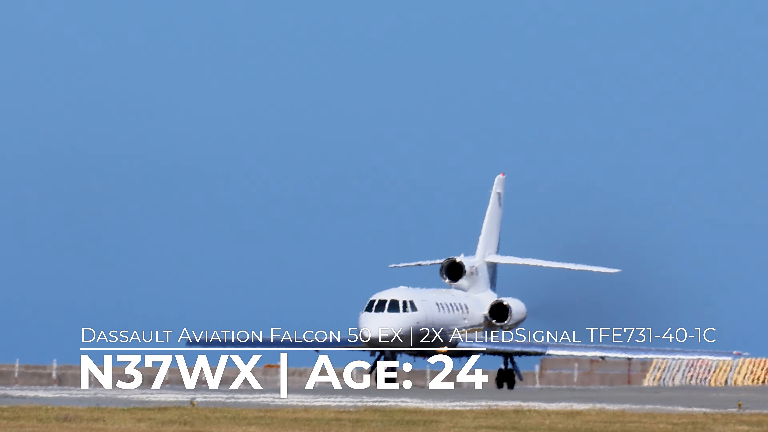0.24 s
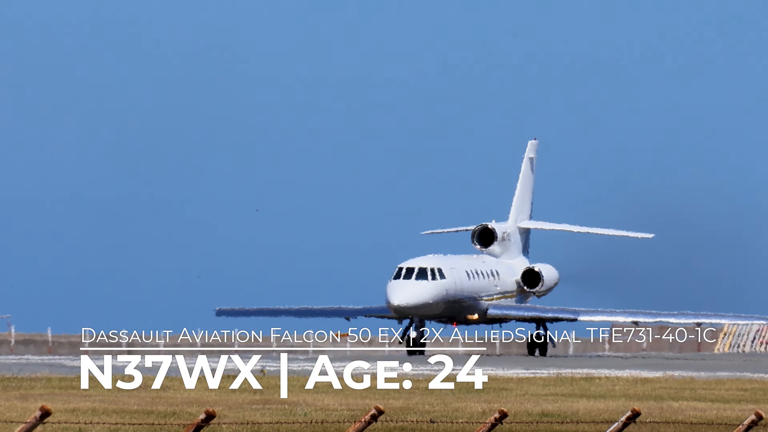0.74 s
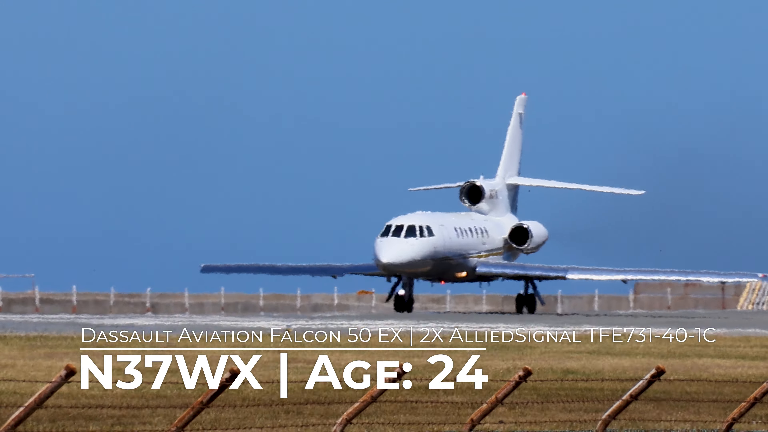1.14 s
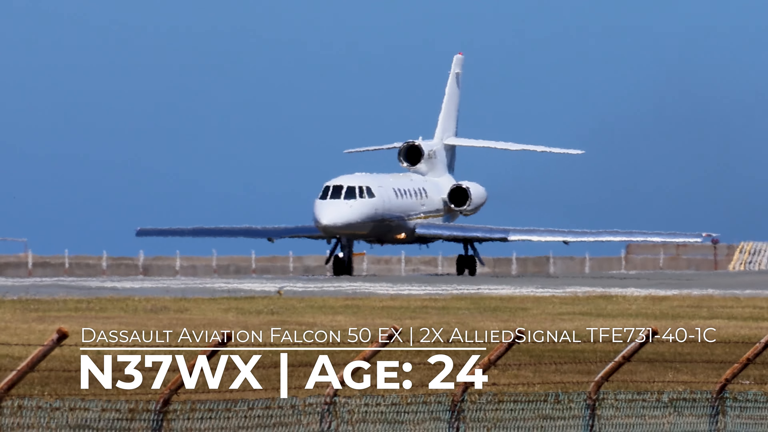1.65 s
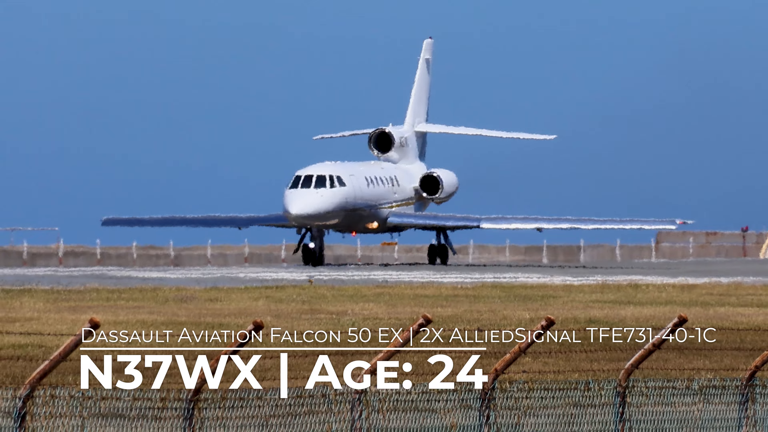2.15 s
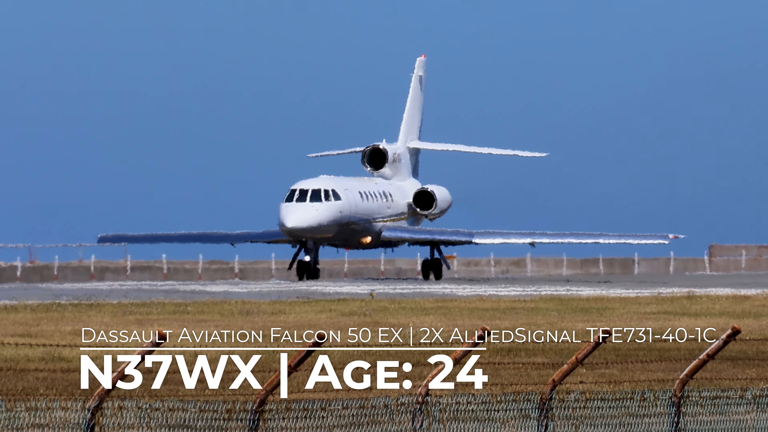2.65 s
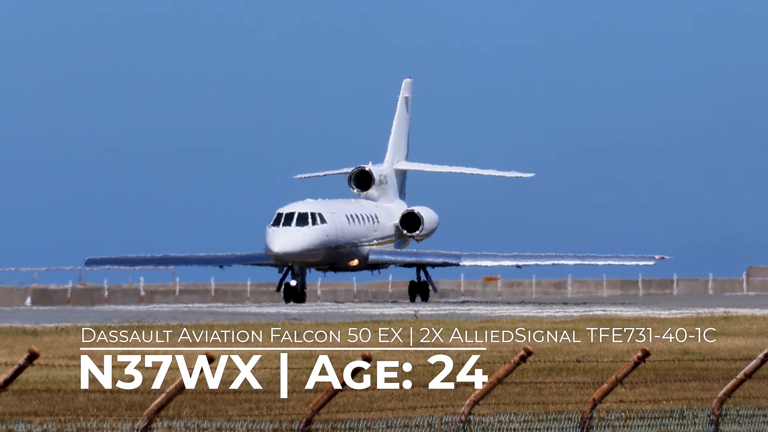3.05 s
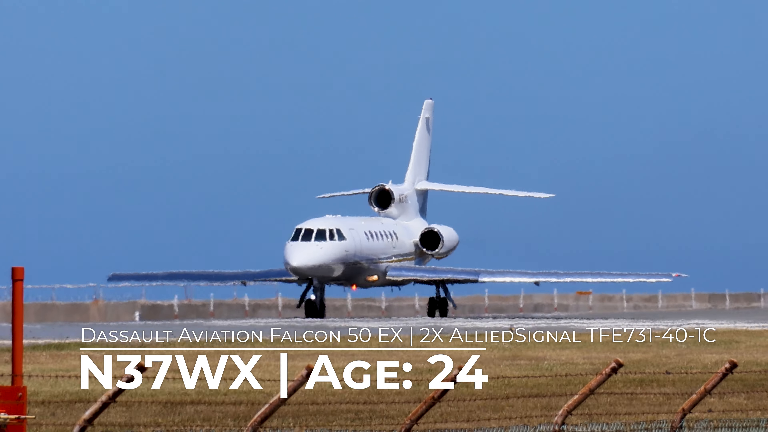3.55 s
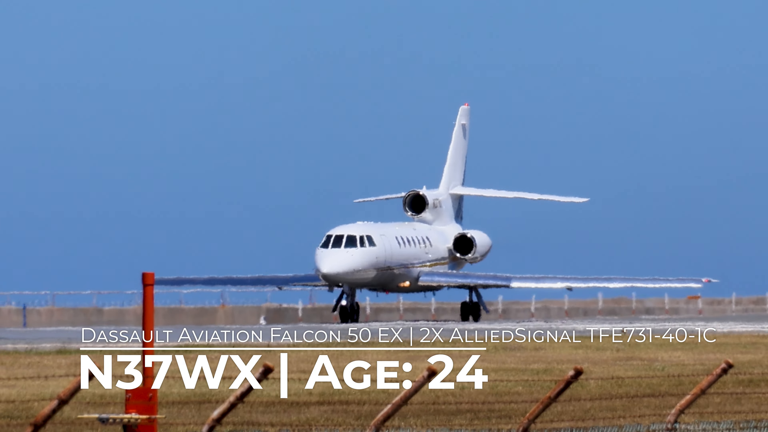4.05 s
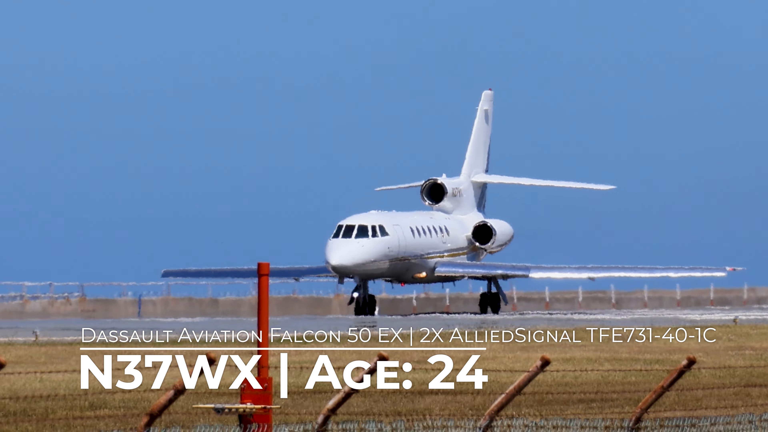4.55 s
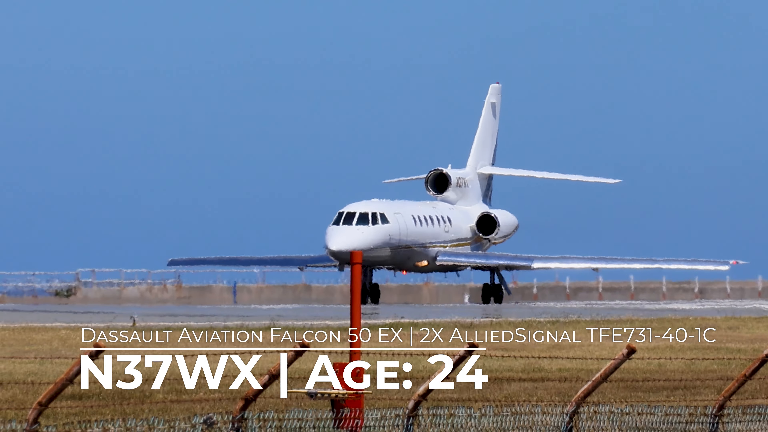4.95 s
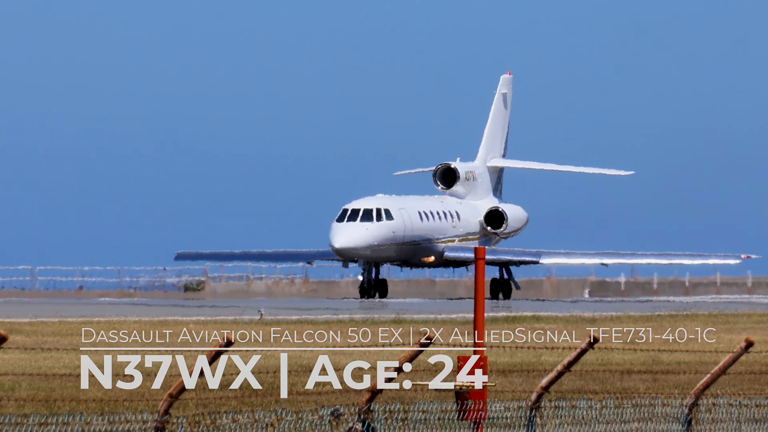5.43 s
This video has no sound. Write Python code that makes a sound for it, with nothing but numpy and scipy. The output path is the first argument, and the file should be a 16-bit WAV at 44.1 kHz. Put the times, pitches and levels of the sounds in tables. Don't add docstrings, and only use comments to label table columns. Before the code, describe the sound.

A three-engined jet far across an open airfield spools up: a soft roar grows over about two and a half seconds while a thin fan whine climbs in pitch. A buzzing mid-high howl then joins and the roar holds, wavering. Close up, wind flaps and thumps the unprotected stereo microphone, with the distant jet dipping briefly after the hardest hits.

```python
import sys
import numpy as np
from scipy import signal
from scipy.fft import irfft, next_fast_len
from scipy.io import wavfile
from scipy.ndimage import uniform_filter1d

SR = 44100
rng = np.random.default_rng(int(sys.argv[2]) if len(sys.argv) > 2 else 0)


def to_wav(sig):
    pcm = np.clip(np.atleast_2d(sig), -1, 1) * 32767
    pcm = np.round(pcm).astype(np.int16)
    wavfile.write(sys.argv[1], SR, pcm.T)


def gain_from_db(level_db):
    decades = np.asarray(level_db, float) / 20
    return 10 ** decades


N = 250929

# t/s, roar level/dB, fan howl band standing out/dB
ENGINE_ROAR = [(0.0, -48.5, -0.5), (0.12, -45.5, -1), (0.55, -39.5, -1.5), (0.96, -35, 0.5),
               (1.3, -33, 0.5), (1.7, -31.5, 0), (2.05, -29.5, 3), (2.38, -27, 2), (2.7, -28.5, 0),
               (3.14, -27, 3.5), (3.47, -32.5, -2), (3.72, -30.5, 2), (4.15, -30, 1), (4.7, -32.5, 1.5),
               (5.1, -33, 2), (5.69, -32, 0.5)]
# f/Hz, level per Hz/dB
ROAR_COLOUR = [(300, -6.5), (520, -7.5), (750, -10.5), (1190, -2.5), (1510, -6), (2170, 0), (2420, -7.5),
               (2730, -7), (3000, -13.5), (4000, -13), (4700, -10), (5400, -18.5), (6000, -32.5),
               (7500, -56.5), (10000, -81.5)]
# f/Hz, level/dB
SLOW_COLOUR = [(500, -4), (1500, 1), (2000, 1), (2500, -14), (3500, 8), (4300, 0), (5500, -27), (8000, 13)]
# t/s, f/Hz, tone level/dB, octave level/dB
BLADE_PASSING = [(0, 2890, -60, -64), (.35, 3110, -51, -66), (.6, 3255, -40, -69),
                 (.85, 3430, -44.5, -60.5), (1.05, 3610, -46, -66), (1.3, 3850, -42.5, -65),
                 (1.6, 4084, -40, -70), (1.78, 4290, -44, -104), (2.1, 4690, -46.5, -120),
                 (2.4, 5020, -42.5, -120), (2.75, 5270, -47.5, -120), (3.1, 5480, -58, -120),
                 (3.5, 5440, -51.5, -120), (4.2, 5510, -52.5, -120), (4.9, 5460, -62.5, -120),
                 (5.4, 5540, -51, -120), (5.69, 5600, -57, -120)]
# speed/share of the first, level under its octave/dB, t until hidden/s
OTHER_FANS = [(1.075, -8, .95), (.945, -9, .8)]
# t/s, f/Hz, level/dB
SHAFT_HOWL = [(2.0, 2125, -46), (2.15, 2160, -39), (2.3, 2176, -26.5), (2.42, 2195, -34.5),
              (2.55, 2201, -31.5), (2.9, 2223, -31), (3.3, 2232, -36), (3.65, 2243, -36.5),
              (3.85, 2254, -42.5), (4.1, 2274, -35.5), (4.4, 2270, -43), (4.72, 2257, -39),
              (5.1, 2277, -46), (5.3, 2286, -41.5), (5.5, 2323, -35), (5.69, 2310, -41.5)]
# order/1, level against the howl (itself order 12)/dB
SHAFT_ORDERS = [(6, -11), (6.5, -11), (8, -14), (10, -11), (11, -10), (14, -15), (15, -17)]
# f/Hz, level per Hz/dB
RUSTLE_COLOUR = [(6000, 13), (7000, 10), (8200, 3.5), (10000, -0.5), (13000, -.5), (15000, -1.5),
                 (16000, -10.5)]
# t/s, half length/s, rise/dB
RUSTLE_SWELLS = [
    (0.052, 0.34, -5.5),
    (1.29, 0.3, 3.5),
    (4.449, .5, -2.5),
    (5.424, .07, 6.5),
]
# t/s, half length/s, level/dB, left minus right/dB
GUSTS = [(0.189, 0.08, -29.5, 1.5), (0.553, 0.18, -36.5, 1.5), (0.78, 0.067, -24.5, 1.5),
         (0.873, .04, -21.5, -2.5), (0.986, 0.11, -18, 2.5), (1.205, 0.13, -32.5, -0.5),
         (1.496, 0.049, -28.5, 1), (1.735, 0.078, -17, 1), (2.042, .05, -22.5, 5), (2.131, 0.029, -20.5, 1),
         (2.201, 0.032, -25, 4), (2.261, 0.031, -23, 5), (2.349, 0.062, -21.5, 6.5), (2.44, 0.088, -18, 2),
         (2.548, 0.031, -22, 7.5), (2.673, 0.036, -21, 2.5), (2.9, 0.06, -29, 3), (3.3, 0.43, -32.5, 1),
         (3.749, 0.088, -14, 0.5), (3.904, 0.068, -33.5, -0.5), (4.137, 0.031, -21, 10),
         (4.206, 0.076, -15, 4.5), (4.415, 0.05, -13, 3), (4.523, 0.1, -21.5, 5), (4.756, 0.063, -19, 3.5),
         (4.893, 0.075, -20, 1.5), (4.999, 0.021, -23, 10), (5.249, 0.094, -14, 2),
         (5.439, 0.11, -19.5, 1.5), (5.658, 0.14, -31, 1)]
# t/s, peak level/dB, f/Hz
THUMPS_LEFT = [(0.239, -14.5, 433), (0.866, -8, 267), (0.96, -7, 347), (0.998, 1.5, 580),
               (1.031, -4.0, 407), (1.72, -5, 480), (1.738, 3, 347), (2.136, -11, 310), (2.426, 2.5, 430),
               (2.447, -4, 380), (2.465, -5, 412), (2.486, -9.5, 382), (3.706, -6.5, 269),
               (3.742, -2.5, 360), (3.769, -6.5, 444), (3.821, -8.5, 334), (4.14, -9, 338),
               (4.179, -2.5, 395), (4.201, -2.5, 566), (4.232, -5, 403), (4.412, -3, 512), (4.505, -4, 620),
               (4.519, -0.5, 690), (4.577, -8.5, 470), (4.625, -9.5, 497), (4.714, -10, 300),
               (4.759, -2, 474), (5.006, -6.5, 500), (5.238, -4, 425), (5.378, -2.5, 470)]
# t/s, peak level/dB, f/Hz
THUMPS_RIGHT = [(0.969, -9.5, 370), (0.998, -8.0, 500), (1.721, -4.5, 420), (1.73, -3.5, 350),
                (2.42, 0.5, 590), (2.435, -4, 370), (2.442, -3, 434), (2.482, -8.5, 420), (3.727, -2, 527),
                (3.752, -1.5, 239), (3.821, -9, 280), (4.179, -1, 375), (4.191, -1, 426),
                (4.422, -1.5, 364), (4.434, -3, 340), (4.756, -8, 524), (4.771, -7.5, 515),
                (4.891, -3, 380), (5.211, -9.5, 322), (5.243, -8, 520), (5.416, -4, 278), (5.481, -7, 577)]
# t/s, peak level/dB, low f/Hz, high f/Hz, t60/s
TICKS = [
    (.315, -60, 5500, 13000, .012),
    (3.311, -36, 5200, 9200, .012),
    (3.353, -61, 9500, 15000, .012),
    (3.408, -64, 7000, 15000, .15),
    (3.415, -53, 7000, 15500, .04),
]
# t/s, drop/dB
DUCKS = [
    (1.002, -4),
    (1.743, -7),
    (2.43, -3.5),
    (3.748, -6.5),
    (4.2, -3.5),
    (4.42, -3.5),
    (4.51, -2),
    (4.762, -2),
    (5.21, -1),
]


def unit(x):
    return x / np.sqrt(np.mean(x ** 2))


def curves(table):
    s, *columns = np.transpose(table)
    t = np.arange(N) / SR
    return [np.interp(t, s, column) for column in columns]


def at(spectrum, hz):
    table_hz, table_db = np.transpose(spectrum)
    return np.interp(np.log(hz), np.log(table_hz), table_db)


def walk(rate_hz):
    hold = int(SR / rate_hz)
    steps = np.repeat(rng.standard_normal(N // hold + 1), hold)
    slewed = uniform_filter1d(uniform_filter1d(steps, hold), hold)
    return unit(slewed[:N])


def coloured(spectrum, lo_hz, hi_hz, channels=1):
    size = next_fast_len(N)
    hz = np.fft.rfftfreq(size, 1 / SR) + 1
    edges = 1 / np.sqrt((1 + (lo_hz / hz) ** 16) * (1 + (hz / hi_hz) ** 16))
    shape = (channels, len(hz))
    bins = rng.standard_normal(shape) + 1j * rng.standard_normal(shape)
    return irfft(bins * gain_from_db(at(spectrum, hz)) * edges, size)[:, :N]


def band(x, lo_hz, hi_hz, order=2):
    return signal.sosfilt(signal.butter(order, [lo_hz, hi_hz], "band", fs=SR, output="sos"), x)


def tone(hz, db, scatter, rate_hz):
    carrier = np.exp(2j * np.pi * np.cumsum(hz) / SR)
    share = np.clip(scatter, 0, 1)
    scattered = np.sqrt(share / 2) * (walk(rate_hz) + 1j * walk(rate_hz))
    path = np.sqrt(1 - share) + scattered
    return np.sqrt(2) * gain_from_db(db + 1.3 * walk(12)) * np.real(path * carrier)


def roar(patchy_db=1.0, flicker_db=1.27, spread=0.16):
    mid_db, howl_db = curves(ENGINE_ROAR)
    low_db = -2.5 - 1.07 * howl_db
    high_db = -6.5 - howl_db
    fan_hz = curves(BLADE_PASSING)[0]
    slow = np.clip((5200 - fan_hz) / 1500, 0, 1)
    edges_hz = 280 * 2 ** (np.arange(17) / 3)
    scale = np.std(coloured(ROAR_COLOUR, 1400, 2900))
    out, shared = 0, walk(5.676)
    for lo, hi in zip(edges_hz[:-1], edges_hz[1:]):
        low_share = np.clip(np.log2(1700 / hi) * 2, 0, 1)
        high_share = np.clip(np.log2(hi / 2700) * 2, 0, 1)
        db = mid_db + low_share * (low_db + 6) + high_share * (high_db + 6)
        db = db + slow * at(SLOW_COLOUR, np.sqrt(lo * hi))
        db = db + 0.57 * shared + patchy_db * walk(3.046) + flicker_db * walk(13)
        mid, side = coloured(ROAR_COLOUR, lo, hi, channels=2)
        width = spread * 1.05 * (hi / 2000) ** 0.87
        out = out + gain_from_db(db) / scale * (mid + width * side * np.array([[1], [-1]]))
    return out


def rumble(under_roar_db=-14):
    level_db = curves(ENGINE_ROAR)[0] + under_roar_db + 5.2 * walk(7.4)
    return gain_from_db(level_db) * unit(band(rng.standard_normal(N), 130, 200, order=1))


def whine():
    t = np.arange(N) / SR
    hz, tone_db, octave_db = curves(BLADE_PASSING)
    blades = tone(hz, tone_db - 2 + 1.5 * walk(20), .9, 160)
    blades = blades + tone(2 * hz, octave_db + 1.5 * walk(14), .7, 110)
    for speed, db, until in OTHER_FANS:
        fade = np.clip((until - t) / .2, 0, 1)
        blades = blades + fade * tone(2 * speed * hz, octave_db + db, .8, 110)
    howl_hz, howl_db = curves(SHAFT_HOWL)
    orders = tone(howl_hz, howl_db, .8 - .2 * np.clip(t - 3, 0, 3), 60)
    buzz_db = uniform_filter1d(howl_db, size=SR)
    for order, db in SHAFT_ORDERS:
        orders = orders + tone(order / 12 * howl_hz, buzz_db + db + 4 * walk(4), .9, 70)
    sonic = np.clip((t - 1.95) / 0.15, 0, 1)
    return blades + sonic * orders


def rustle(wind_db, shared=0.25):
    t = np.arange(N) / SR
    db = -75.5 - 0.5 * np.clip(wind_db + 27, 0, None)
    for s, half, rise in RUSTLE_SWELLS:
        db = db + rise * np.exp(-((t - s) / half) ** 2)
    noise = coloured(RUSTLE_COLOUR, 5800, 16000, channels=2)
    left, right = noise / np.std(band(noise, 9000, 15000))
    ports = np.array([left - shared * right, 1.4 * (right - shared * left)])
    return gain_from_db(db + 5 + 2 * walk(17)) * ports


def gusts(edge_db=14, lull_db=-52.5):
    t = np.arange(0, N + 64, 64) / SR
    s, half, db, pan_db = np.transpose(GUSTS)[:, :, None]
    power = gain_from_db(2 * (db - edge_db * np.abs((t - s) / half) ** 1.52))
    total = power.sum(axis=0) + gain_from_db(2 * lull_db)
    lean_db = (power * pan_db).sum(axis=0) / total
    return [np.interp(np.arange(N) / SR, t, c) for c in (10 * np.log10(total), lean_db)]


def buffet(wind_db, pan_db, lumps_db=4.0, alike=0.39):
    bright_db = -10 + 0.54 * (wind_db + 24.5) + 4.1 * walk(20)
    deep = unit(band(rng.standard_normal(N), 95, 200))
    ports = []
    for side in (1, -1):
        low = unit(band(rng.standard_normal(N), 171.4, 334)) + alike * deep
        high = unit(band(rng.standard_normal(N), 317, 796, order=3))
        lumps = unit(gain_from_db(lumps_db * walk(80)))
        level = gain_from_db(wind_db - 4.5 + side * pan_db / 2)
        ports.append(level * lumps * (low + gain_from_db(bright_db) * high))
    return np.array(ports)


def eddies(wind_db, pan_db, per_s=45):
    timing, strength, pitch = rng.standard_normal((int(N / SR * per_s), 3)).T
    s = (np.arange(len(timing)) + .5 + 0.3022 * timing) / per_s
    s = np.clip(s, 0, (N - 1) / SR)
    port_db = wind_db + pan_db / 2
    db = port_db[(s * SR).astype(int)] + 2.5 + 4 * strength
    return list(zip(s, db, 380 * np.exp(0.19 * pitch)))


def thumps(wind_db, pan_db, cycles=0.85, trim_db=-1.0, sharp=0.3):
    half = 1000
    out = np.zeros((2, N + 2 * half))
    left = THUMPS_LEFT + eddies(wind_db, pan_db)
    right = THUMPS_RIGHT + eddies(wind_db, -pan_db)
    for port, table in enumerate((left, right)):
        phases = rng.uniform(0, 2 * np.pi, len(table))
        for (s, db, hz), phase in zip(table, phases):
            turns = np.arange(-half, half) / SR * hz
            swing = np.cos(2 * np.pi * turns + phase) * np.exp(-(turns / cycles) ** 2)
            crest = np.cos(4 * np.pi * turns + 2 * phase) * np.exp(-(2 * turns / cycles) ** 2)
            i = int(s * SR)
            out[port, i:i + 2 * half] += gain_from_db(db + trim_db) * (swing + sharp * crest)
    high_pass = signal.butter(2, 110, "high", fs=SR, output="sos")
    return signal.sosfiltfilt(high_pass, out[:, half:N + half])


def ticks():
    t = np.arange(6000) / SR
    out = np.zeros((2, N + len(t)))
    for s, db, lo_hz, hi_hz, t60 in TICKS:
        burst = unit(band(rng.standard_normal((2, len(t))), lo_hz, hi_hz, order=4))
        i = int(s * SR)
        out[:, i:i + len(t)] += gain_from_db(db - 60 * t / t60) * burst
    return out[:, :N]


def gain_control(recovery_s=0.32):
    t = np.arange(N) / SR
    duck_db = sum(db * (t > s) * np.exp(-np.abs(t - s) / recovery_s) for s, db in DUCKS)
    return gain_from_db(uniform_filter1d(duck_db, size=100) + 0.5)


def scene():
    duck = gain_control()
    jet = (roar() + whine()) * duck * gain_from_db([[.3], [-.3]])
    wind_db, pan_db = gusts()
    dull = signal.butter(4, 2500, fs=SR, output="sos")
    pressure = signal.sosfilt(dull, rumble() * duck + buffet(wind_db, pan_db))
    return jet + pressure + thumps(wind_db, pan_db) + rustle(wind_db) + ticks()


def band_limit(x):
    return signal.sosfilt(signal.butter(12, 15750, fs=SR, output="sos"), x)


def record(dry):
    cut = signal.sosfilt(signal.butter(3, 75, "high", fs=SR, output="sos"), dry)
    rounded = cut / (1 + cut ** 6) ** (1 / 6)
    return band_limit(rounded)


dry = scene()
out = record(dry)
to_wav(out)
```